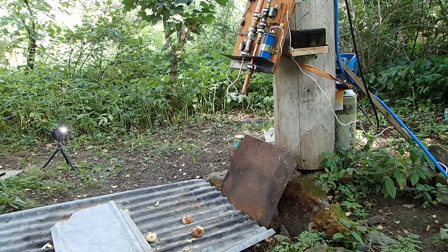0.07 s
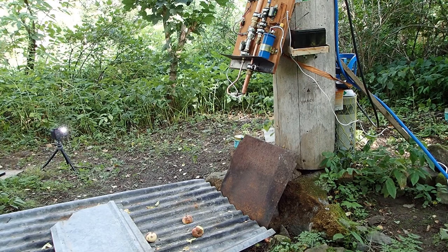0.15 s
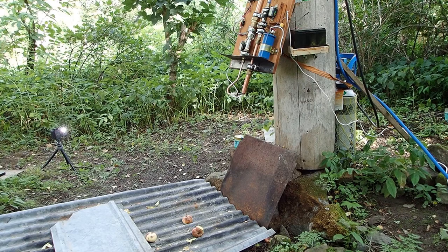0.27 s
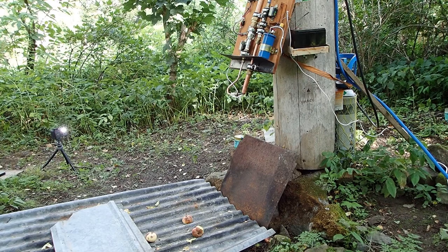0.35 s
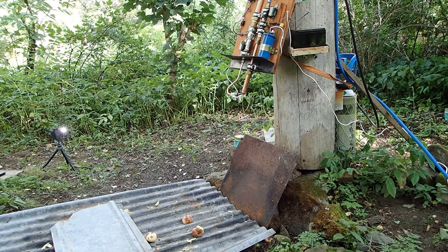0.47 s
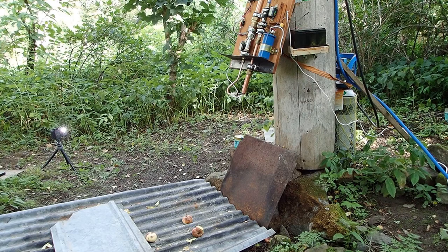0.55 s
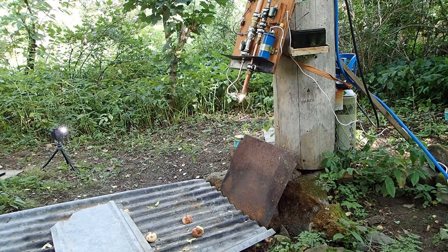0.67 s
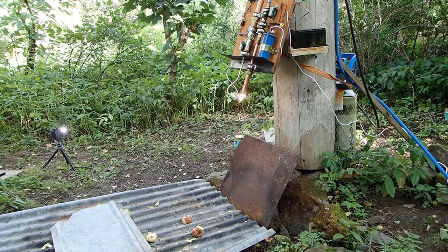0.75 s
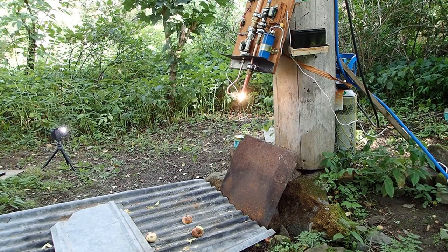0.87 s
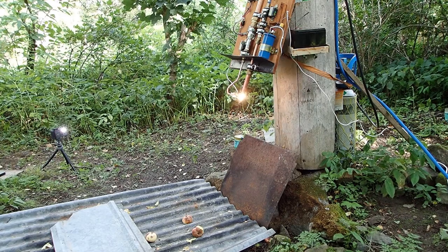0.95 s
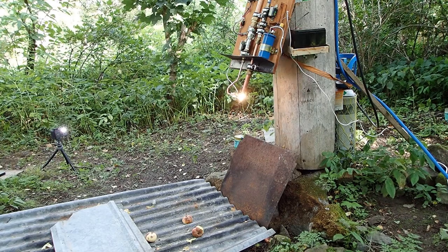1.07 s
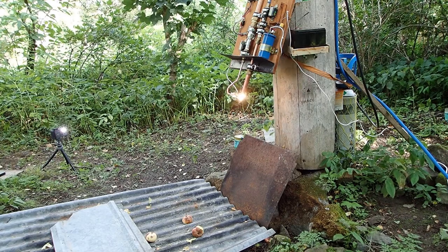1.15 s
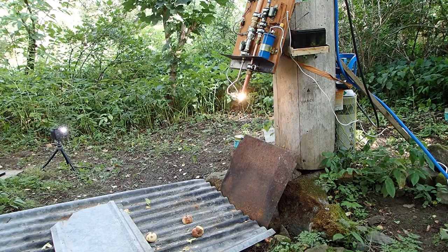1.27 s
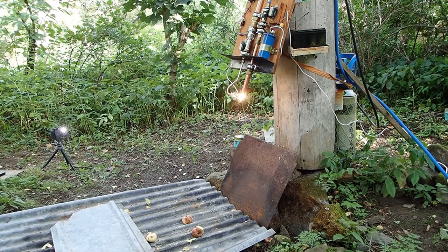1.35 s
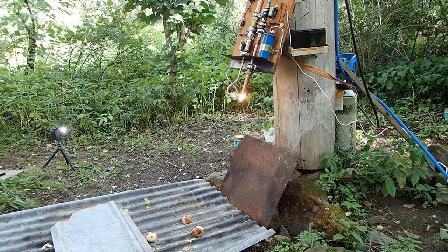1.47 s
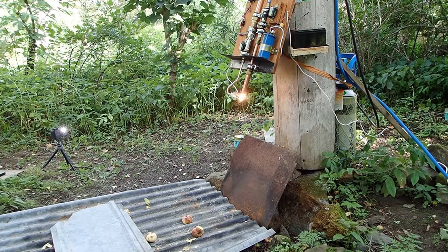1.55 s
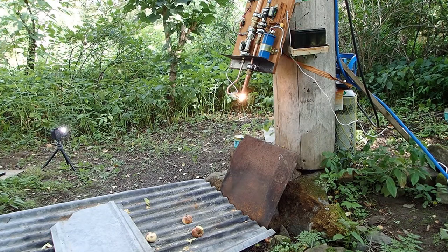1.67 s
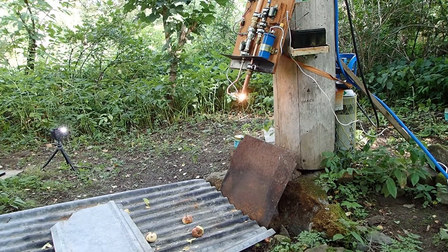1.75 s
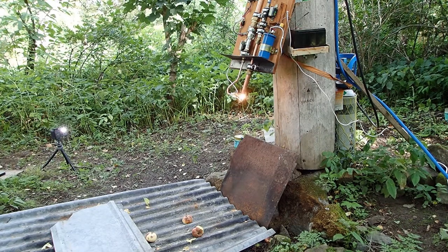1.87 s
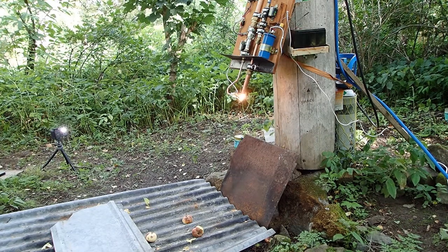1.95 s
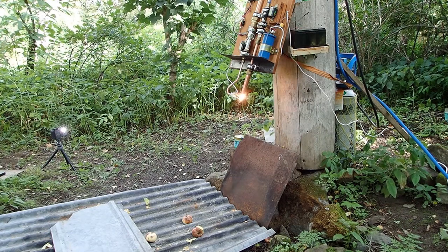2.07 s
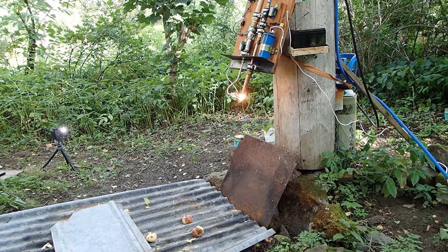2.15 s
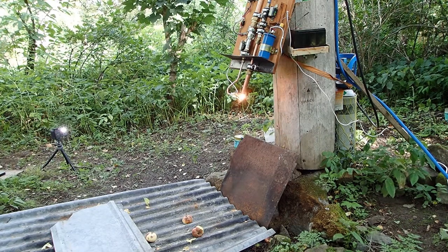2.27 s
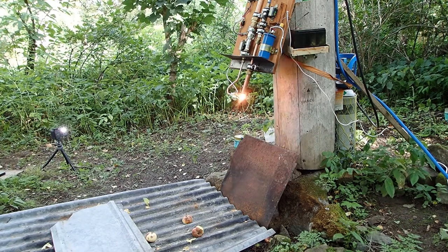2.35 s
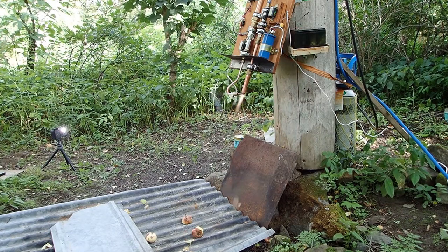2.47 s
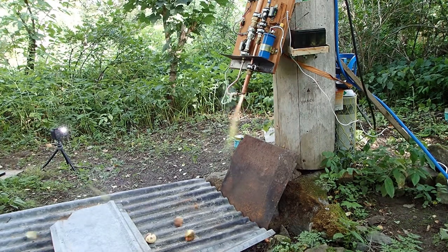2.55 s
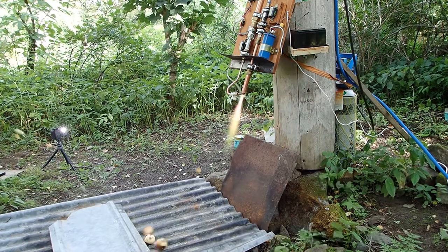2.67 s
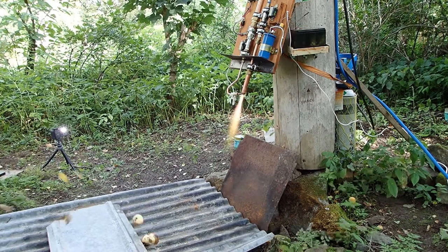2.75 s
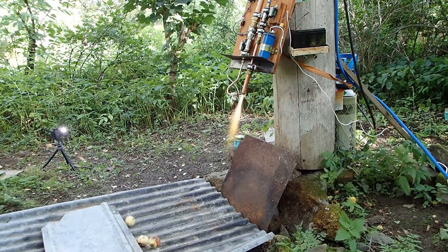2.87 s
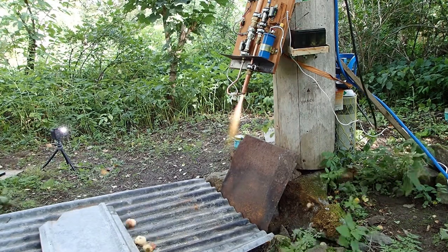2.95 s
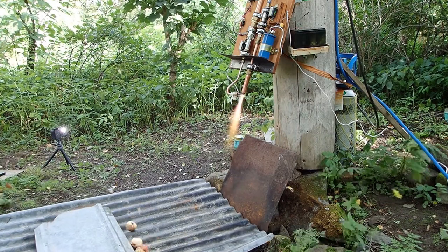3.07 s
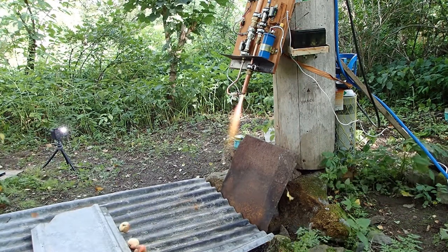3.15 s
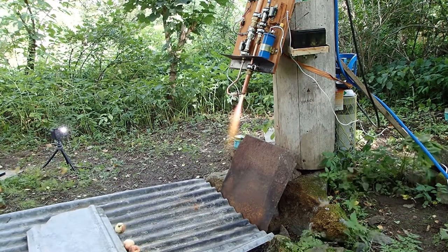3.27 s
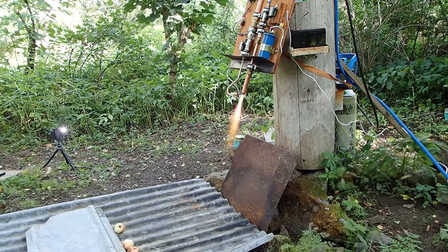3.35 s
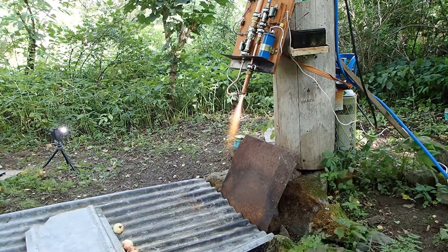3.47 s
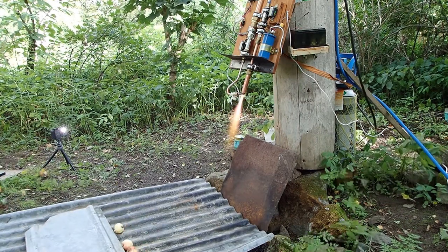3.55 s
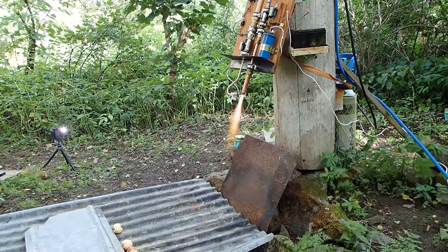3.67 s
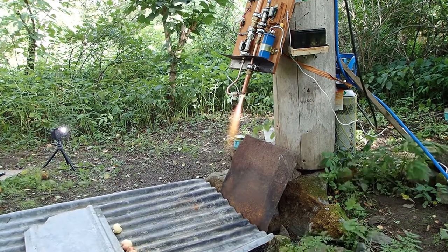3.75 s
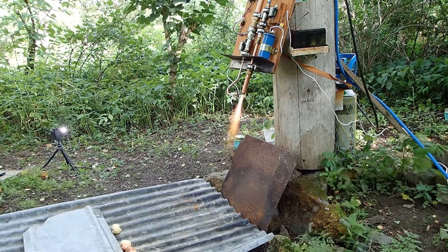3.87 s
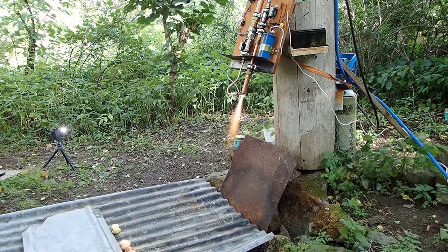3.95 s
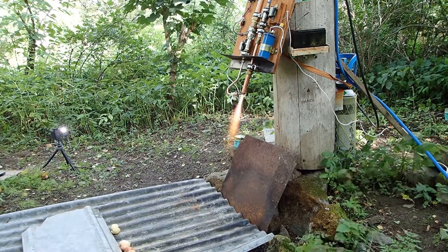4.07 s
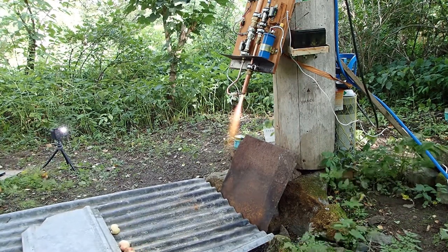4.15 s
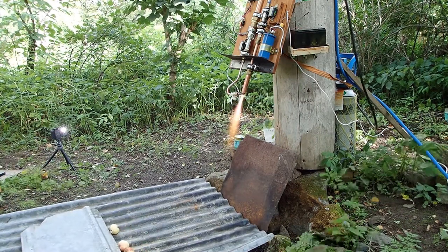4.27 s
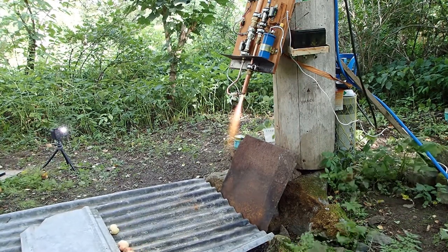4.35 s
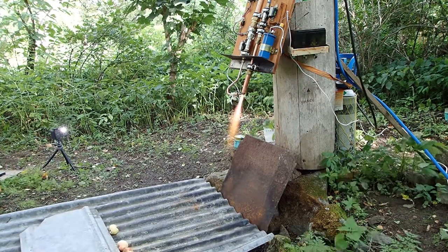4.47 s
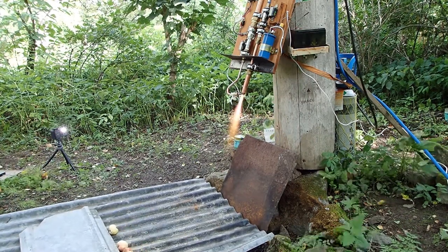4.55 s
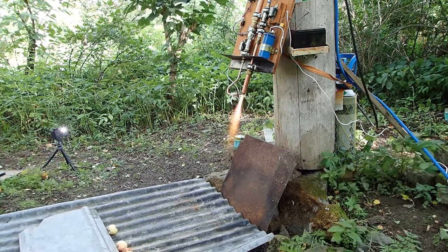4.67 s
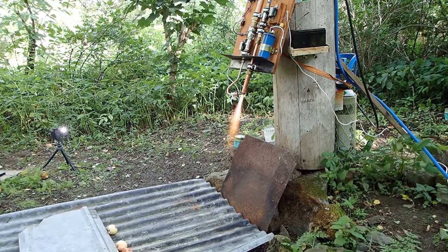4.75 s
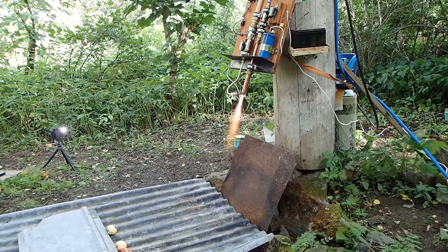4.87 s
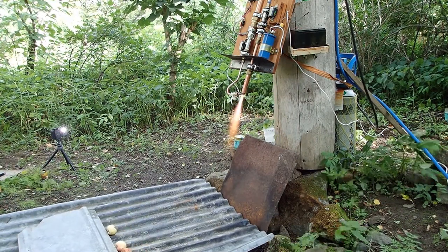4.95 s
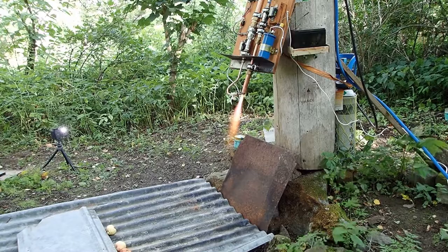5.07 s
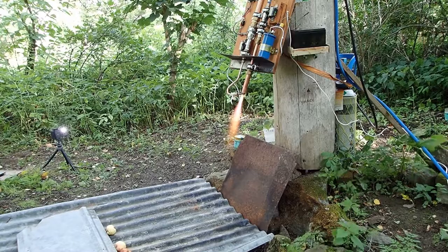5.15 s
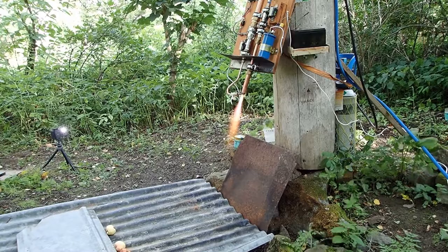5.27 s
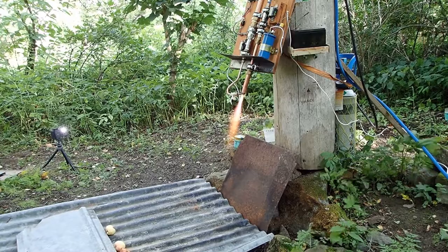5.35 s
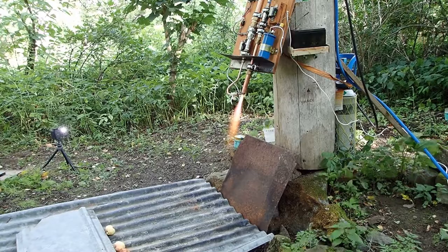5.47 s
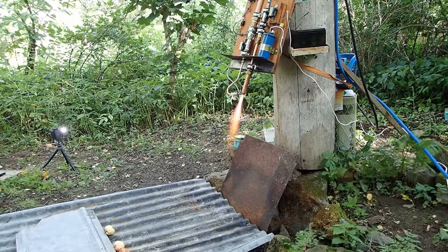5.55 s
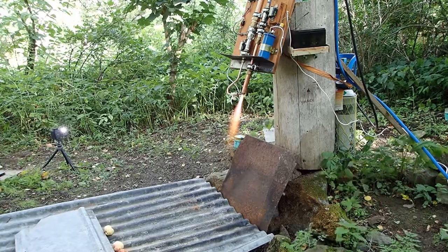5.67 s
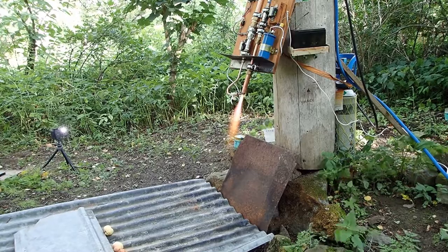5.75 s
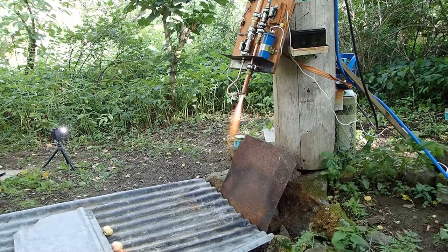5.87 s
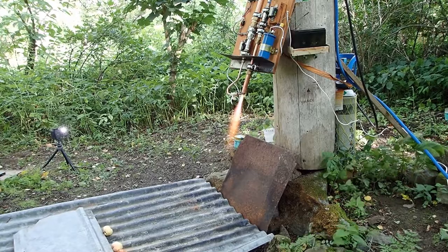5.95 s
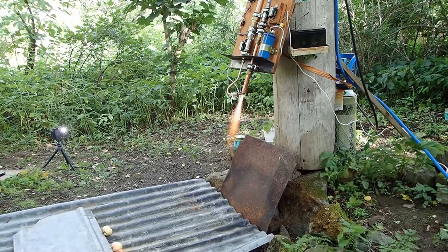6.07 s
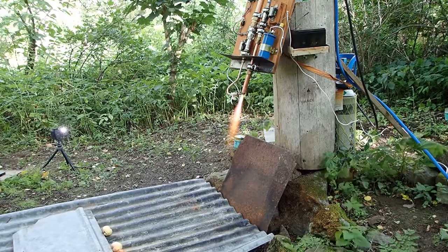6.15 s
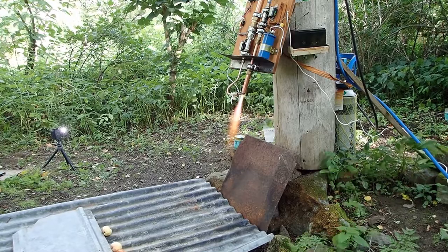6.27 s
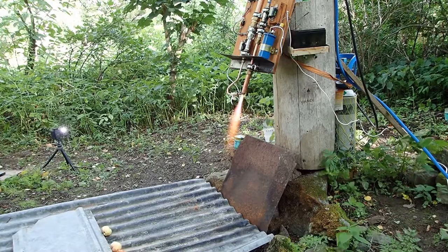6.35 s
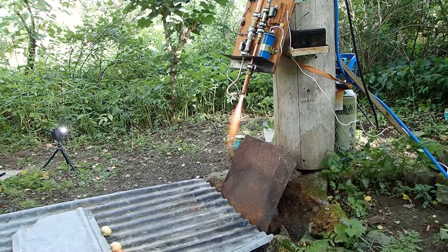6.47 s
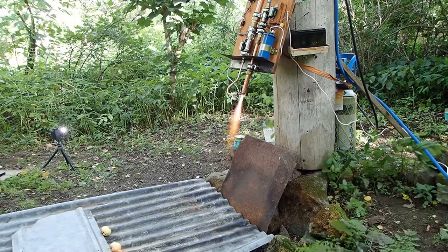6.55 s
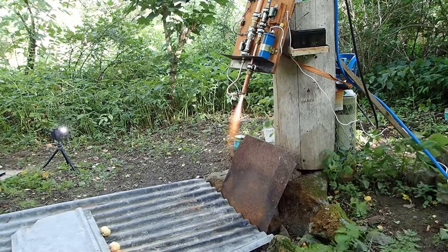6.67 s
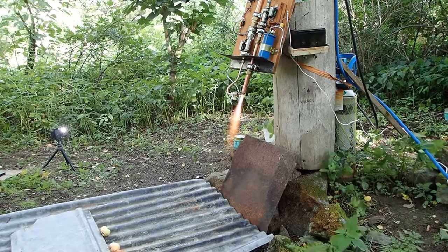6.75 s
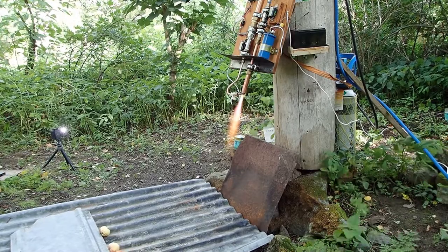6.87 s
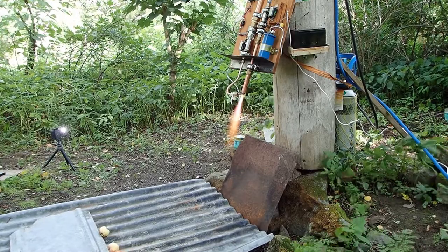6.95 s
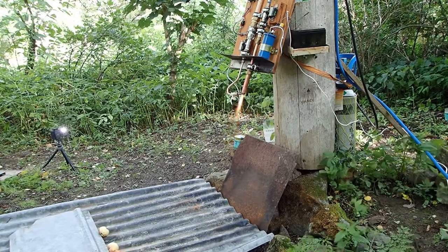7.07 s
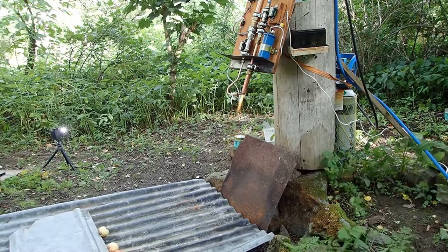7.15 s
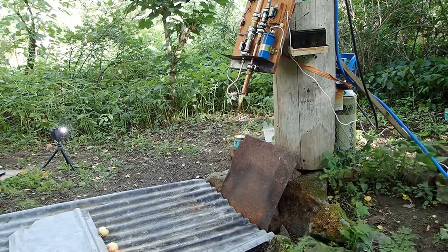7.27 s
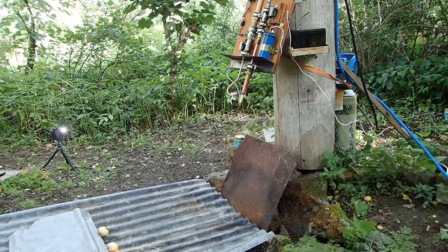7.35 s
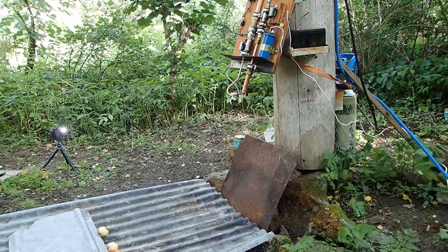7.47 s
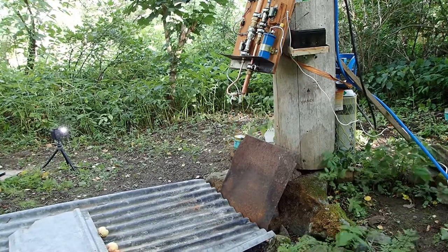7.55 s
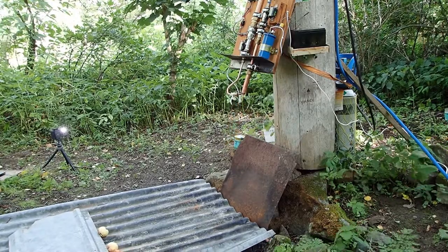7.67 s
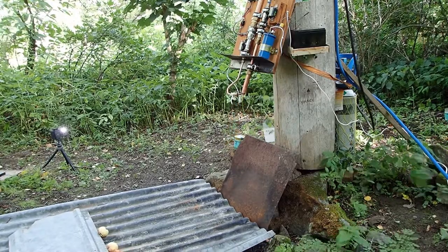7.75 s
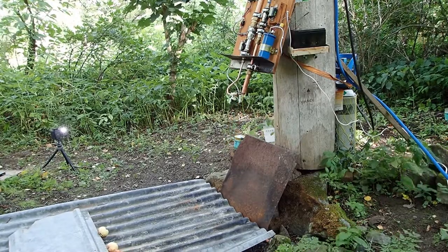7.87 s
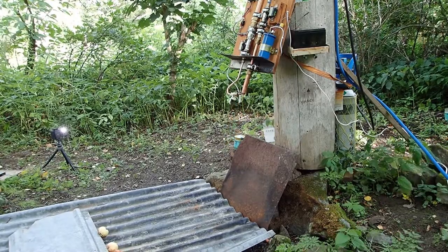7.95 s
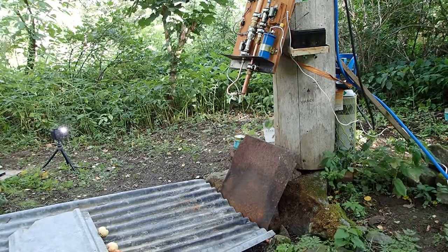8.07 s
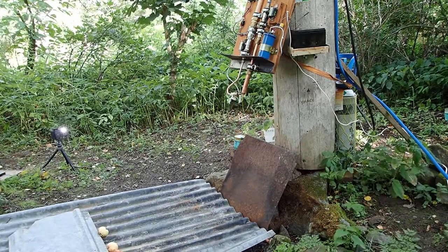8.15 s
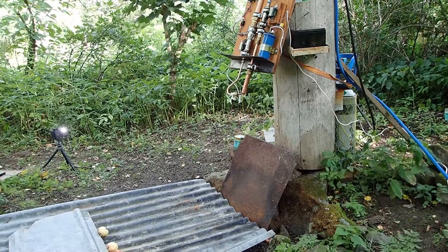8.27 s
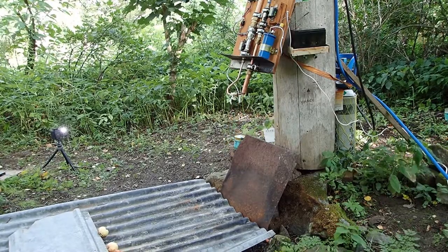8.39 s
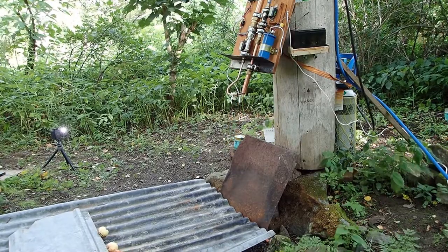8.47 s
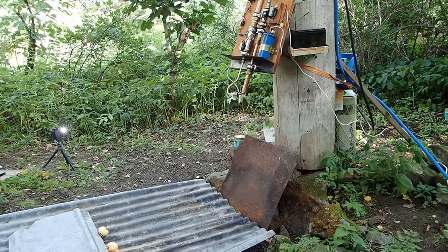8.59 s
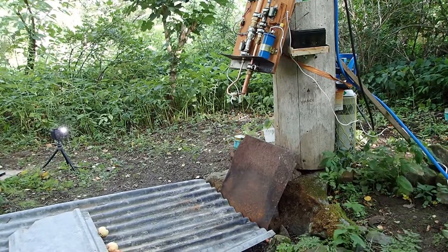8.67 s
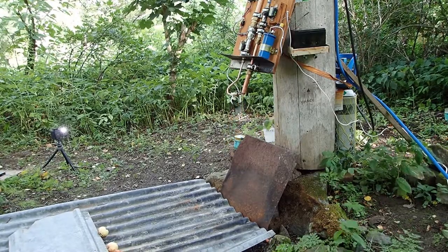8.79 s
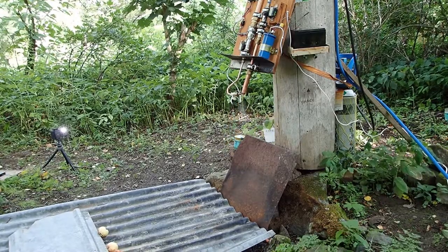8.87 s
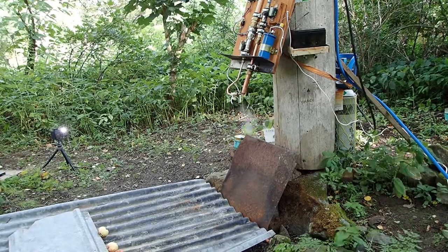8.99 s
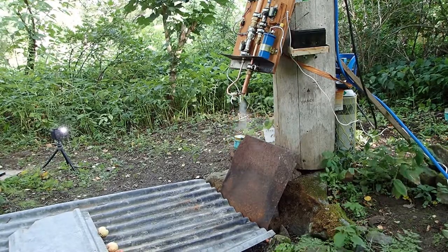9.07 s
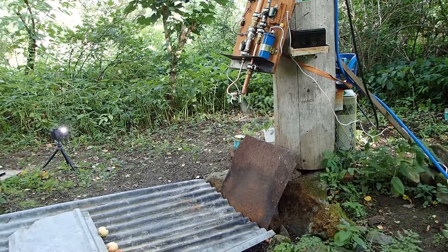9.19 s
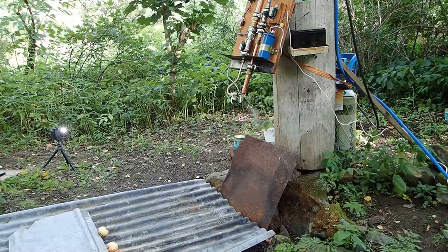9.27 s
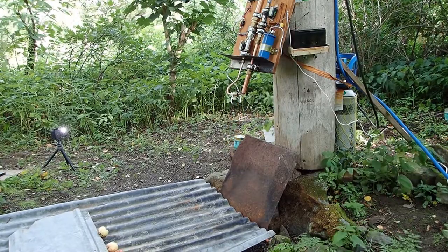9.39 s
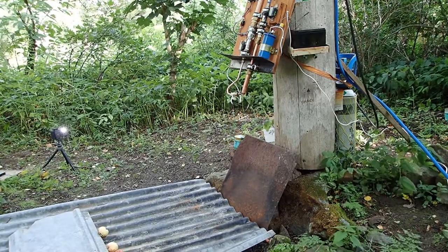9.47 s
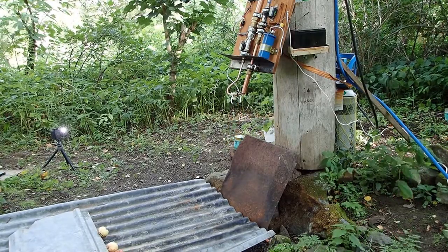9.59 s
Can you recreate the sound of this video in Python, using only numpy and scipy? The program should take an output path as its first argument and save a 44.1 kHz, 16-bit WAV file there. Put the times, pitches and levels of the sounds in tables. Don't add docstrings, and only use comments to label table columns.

```python
import sys
import numpy as np
from scipy import signal
from scipy.fft import rfft, irfft, next_fast_len
from scipy.io import wavfile
from scipy.ndimage import uniform_filter1d, map_coordinates

SR = 44100
rng = np.random.default_rng(int(sys.argv[2]) if len(sys.argv) > 2 else 0)


def volts_from_decibels(level):
    exponent = np.asarray(level, float) / 20
    return 10 ** exponent


def store_pcm(level_fs):
    pcm = np.round(np.clip(level_fs, -1, 1) * 32767).astype(np.int16)
    wavfile.write(sys.argv[1], SR, np.atleast_2d(pcm).T)


N = 424241

VALVES = [
    .0735,
    .781,
    2.5872,
    7.22,
    7.7,
    8.85,
    9.63,
]
LIT, CUT_OFF = VALVES[2], VALVES[3]
# [t/s, hiss level/dB]
DRAIN_FLOW = [
    (8.85, -31),
    (8.9, -29),
    (9.1, -32),
    (9.51, -49),
    (9.6, -56),
]
WARM_S = 0.091


def along(points, hz):
    f, v = np.transpose(points)
    return np.interp(np.log(hz + 1), np.log(f + 1), v)


def unit(x):
    return x / np.sqrt(np.mean(x ** 2) + 1e-20)


def span(rows, on, off, rise, fall):
    s, *cols = np.transpose(rows)
    start = round((on - rise / 2) * SR)
    end = min(N, round((off + fall / 2) * SR))
    t = np.arange(start, end) / SR
    opening = np.clip((t - t[0]) / rise, 0, 1)
    closing = np.clip((off + fall / 2 - t) / fall, 0, 1)
    return start, t, np.sqrt(opening * closing), [np.interp(t, s, c) for c in cols]


def wobble(n, rate):
    knots = rng.standard_normal(int(n * rate / SR) + 4)
    return map_coordinates(knots, [np.arange(n) * rate / SR])


def filtered(x, response):
    m = next_fast_len(x.shape[-1] + 8192)
    return irfft(rfft(x, m) * response(np.fft.rfftfreq(m, 1 / SR)), m)[..., :x.shape[-1]]


def ports(direct, scattered, spread):
    # [f/Hz, likeness of the two ports]
    likeness = [(60, .8), (150, .97), (1000, .975), (2500, .975), (3800, .87), (6500, .92), (8500, .83),
                (11000, .84), (14000, .75)]
    # [f/Hz, left over right level/dB]
    lean = [(60, -2), (110, -8.5), (200, -7.5), (380, -2.5), (700, 0.5), (1290, 0.5), (2380, -2.5),
            (4400, -3), (8120, 2.5), (15000, 3)]
    # [f/Hz, phase by which left leads/rad]
    lead = [(60, .63), (150, .83), (300, .83), (720, .48), (1300, .12), (2500, 0), (3800, .2), (5000, .7),
            (6000, .31), (7000, .62), (8000, .28), (11000, .06), (13500, .27)]

    def turn(hz):
        return np.arccos(np.clip(along(likeness, hz), 0, 1) ** spread) / 2

    def half(hz):
        return along(lean, hz) * np.log(10) / 40 + .5j * along(lead, hz)

    mid = filtered(direct, lambda hz: np.cos(turn(hz)))
    side = filtered(scattered, lambda hz: np.sin(turn(hz)))
    return filtered(np.array([mid + side, mid - side]), lambda hz: np.exp(half(hz) * [[1], [-1]]))


def add(out, start, x):
    out[:, start:start + x.shape[1]] += x


def swells(t, events, length):
    return sum(volts_from_decibels(db) * np.exp(-((t - s - length) / length) ** 2) for s, db, *_ in events)


def surge(t):
    return np.exp(-((t - 2.78) / .075) ** 2)


def jet(out, rows, air, tube, order, rise, fall, flutter_db, eddy_db, puff_db,
        roar_db=-0.87, tube_db=-6.0, flow_db=1.17, count=1):
    # [roar level/dB, its dB per dB of flow, its drift/(dB/s), fizz level/dB, its dB per dB of flow]
    blend = [
        (-3, 0.4, 0.4, -5, -0.3),
        (-11, -0.35, -4, -15, -0.3),
        (-8, -1.05, -0.22, -12.5, -0.1),
        (-18, 0.3, -8, -11.5, 0),
        (-23, 0.05, 1.3, -11.5, 0),
        (-14.5, -0.18, 5, -4.5, 0.1),
    ]
    # [t/s, depth/dB, half length/s]
    gaps = [
        (4.827, 2, 0.027),
        (7.105, 2, 0.024),
        (7.315, 2, 0.013),
        (7.462, 4.5, 0.0076),
        (7.59, 8, 0.007),
    ]
    # [t/s, extra fizz/dB, extra roar/dB, half length/s]
    spits = [
        (2.568, 1, 4, 0.028),
        (8.15, 4.5, 0.5, .09),
        (8.61, 3, -2, 0.13),
        (8.845, -2, -1, 0.048),
        (8.915, 0, 6, .015),
        (8.95, 0, 4.5, 0.036),
    ]
    scatter = [1.5, 1, 2.4, 2.3, 1.6, 1]
    flame_out_db, flame_out_s = 4.5, 0.06
    cold_roar_db, surge_roar_db = 5, 5
    roar_hz, fizz_hz = 3000, 10000

    start, t, ramp, (hiss_db,) = span(rows, VALVES[order], VALVES[order + count], rise, fall)
    n = len(t)
    low_db, low_follows, low_drift, fizz_db, fizz_follows = blend[order]
    for s, db, half in gaps:
        hiss_db = hiss_db - db * np.exp(-((t - s) / half) ** 2)
    swing_db = hiss_db - hiss_db.mean()
    low_db = low_db + low_follows * swing_db + low_drift * (t - t.mean())
    low_db = low_db + surge_roar_db * surge(t)
    low_db = low_db - flame_out_db * np.exp(-((t - CUT_OFF) / flame_out_s) ** 2)
    low_db = low_db - cold_roar_db * np.exp(-np.abs(t - LIT) / WARM_S) * (t > LIT)
    fizz_db = fizz_db + fizz_follows * swing_db
    for s, more_fizz_db, more_roar_db, half in spits:
        bump = np.exp(-((t - s) / half) ** 2)
        fizz_db = fizz_db + more_fizz_db * bump
        low_db = low_db + more_roar_db * bump

    def colour(hz):
        power = volts_from_decibels(2 * along(air, hz))
        for c, w, db in tube:
            power = power + volts_from_decibels(2 * (db + tube_db)) / (1 + (2 * (hz - c) / w) ** 2) ** 1.22
        return np.sqrt(power)

    eddies = volts_from_decibels(eddy_db * wobble(n, 300)) * rng.standard_normal((2, n))
    pair = ports(*filtered(eddies, colour), scatter[order])
    roar = filtered(pair, lambda hz: 1 / (1 + (hz / roar_hz) ** 10))
    fizz = filtered(pair, lambda hz: 1 - 1 / (1 + (hz / fizz_hz) ** 40))
    puffs = volts_from_decibels(puff_db * wobble(n, 70))
    lumps = filtered(puffs * roar, lambda hz: 1 - 1 / (1 + (hz / 60) ** 4))
    mix = unit(pair - roar - fizz)
    mix = mix + volts_from_decibels(low_db + roar_db) * unit(lumps) + volts_from_decibels(fizz_db) * unit(fizz)
    flutter = flutter_db * wobble(n, 18)
    add(out, start, ramp * volts_from_decibels(hiss_db + flow_db + flutter) * mix)


UNDER = np.array([0, 3])


def leak(out):
    # [t/s, hiss level/dB]
    flow = [
        (.1, -50),
        (9.6, -54.5),
    ]
    # [f/Hz, spectral level/dB]
    air = [(24, -45), (40, -6), (91, -4), (108, -7), (235, -4), (1600, -3.5), (1770, -1), (2450, -23),
           (3470, -22), (4500, -16), (5860, -6.5), (7340, -5.5), (9190, -13), (10900, -24), (13400, -11),
           (15500, -23)]
    # [f/Hz, width/Hz, level/dB]
    tube = [(6060, 75, -3), (6540, 170, -3), (7470, 110, -6), (9020, 140, 3.5), (11700, 120, -6),
            (12400, 150, -16), (13200, 140, -6), (13600, 57, -9), (14300, 130, -12)]
    jet(out, flow, air - UNDER, tube, order=0, count=6, rise=0.00204, fall=.004,
        flutter_db=1.0, eddy_db=0.5, puff_db=0.7)


def buffet(out):
    # [t/s, peak level/dB, f/Hz]
    gusts = [(2.714, -29, 159.3), (2.975, -37, 218), (3.216, -29, 195.8), (3.372, -29, 220),
             (3.504, -26, 212), (3.75, -32, 180), (3.807, -25, 201.6), (4.171, -28, 204),
             (4.222, -35, 218.6), (4.385, -28, 208), (4.681, -35, 197.4), (4.858, -35, 153.9),
             (5.067, -34, 149.8), (5.258, -42, 181.6), (5.291, -31, 205), (5.427, -45, 209.5),
             (5.506, -38, 179), (5.59, -55, 137), (5.668, -51, 176), (5.846, -51, 70.6),
             (5.846, -26, 134.4), (6.173, -29, 134.8), (6.379, -35, 216.8), (6.928, -25, 199),
             (6.977, -32, 120), (7.099, -41, 193.3)]
    # [t/s, peak level/dB, f/Hz]
    knocks = [(7.5, -38, 209), (7.54, -39, 170), (7.59, -32, 190), (7.785, -43, 110), (7.93, -46, 130),
              (8.03, -53, 110), (8.9, -34, 380), (2.71, -28, 200), (2.737, -24, 220), (2.765, -25, 200),
              (2.786, -33, 237), (2.808, -28, 170), (2.829, -30, 300)]
    # [f/Hz, spectral level/dB]
    rumble = [(20, -20), (40, -15), (70, -4.5), (150, -3.5), (400, -3.5), (900, -6), (2000, -60)]
    calm_db = [-66, -73, -50.5, -63, -67, -63]
    wake_db, wake_s = -20.5, 0.22
    surge_stir_db = 13
    shared = .45

    start = round(VALVES[0] * SR)
    t = np.arange(start, N) / SR
    stage = np.searchsorted(VALVES[1:], t)
    stage_db = uniform_filter1d(np.take(calm_db, stage) * 1., size=SR // 20)
    wake = np.interp(t, t[::200], swells(t[::200] + wake_s, gusts, wake_s))
    stir = volts_from_decibels(stage_db) + volts_from_decibels(wake_db) * wake * (t > LIT)
    stir_db = 20 * np.log10(stir) + surge_stir_db * surge(t)
    lumps_db = 2.6 * np.array([wobble(len(t), 21), wobble(len(t), 16)])
    air = unit(filtered(rng.standard_normal((2, len(t))), lambda hz: volts_from_decibels(along(rumble, hz))))
    left, right = air * volts_from_decibels(stir_db - 0.5 + lumps_db)
    left = (1 - shared) * left + shared * np.roll(right, -30)
    add(out, start, np.array([left, right]) * volts_from_decibels([[-4], [3]]))

    t = np.arange(SR // 16) / SR
    for s, db, hz in gusts + knocks:
        turn = rng.uniform(0, 2 * np.pi) + np.array([[1], [0]]) * rng.normal(0.73, 0.8)
        push = np.exp(-((t - .013) * hz / 0.57) ** 2) * np.cos(2 * np.pi * hz * t + turn)
        add(out, round(s * SR), volts_from_decibels(db + 3.5) * push * volts_from_decibels([[-5], [4]]))


def torch(out):
    # [t/s, hiss level/dB]
    flow = [
        (.79, -14),
        (.844, -17.5),
        (1.066, -15.5),
        (1.186, -17.5),
        (2.064, -18),
        (2.336, -14.5),
        (2.52, -14),
        (2.57, -14.5),
    ]
    # [f/Hz, spectral level/dB]
    air = [(24, -75), (40, -35), (166, -9.5), (280, -12), (562, -4.5), (838, -10.5), (1080, 3.5),
           (1350, -11), (1730, -4), (3390, -31), (5650, -16), (6640, -9), (7300, -13), (8960, -11),
           (10400, -23.5), (13400, -18.5), (15500, -32)]
    # [f/Hz, width/Hz, level/dB]
    tube = [(1040, 110, -23), (1540, 180, -1.5), (4250, 170, -13), (4900, 87, -1), (5370, 270, -1.5),
            (5950, 220, 2), (6430, 160, 2.5), (6830, 170, 4), (7090, 150, 2), (7570, 130, -1),
            (8050, 170, -3), (8670, 250, -1.5), (9050, 150, -5), (9470, 220, -3.5), (11000, 220, -14),
            (11400, 160, -15), (12300, 220, -29), (13900, 120, -22)]
    jet(out, flow, air - UNDER, tube, order=1, rise=0.011, fall=0.0049,
        flutter_db=0.66, eddy_db=0.8, puff_db=0.5, tube_db=-8.0)


def burn(out):
    # [t/s, hiss level/dB]
    flow = [
        (2.595, -10),
        (2.66, -12),
        (2.783, -13.5),
        (2.95, -17),
        (3.2, -16),
        (4.25, -16),
        (5.4, -16),
        (7.22, -15.5),
    ]
    # [f/Hz, spectral level/dB]
    air = [(24, -68), (40, -45), (162, -24.5), (461, -20), (653, -12), (722, -4), (998, -13), (1490, -11.5),
           (3140, -34), (4030, -27), (5300, -15.5), (6500, -9.5), (7000, -9.5), (7650, -14.5), (8740, -10),
           (9500, -14.5), (10400, -20), (11400, -14.5), (14000, -16), (15500, -25.5)]
    jet(out, flow, air, [], order=2, rise=.002, fall=.05,
        flutter_db=0.65, eddy_db=0.59, puff_db=2.0, roar_db=-1.0)


def ignition(out):
    # [t/s, peak level/dB]
    light_up = [
        (2.588, 0),
    ]
    t = np.arange(SR // 20) / SR
    for s, db in light_up:
        push = (1 - t / .0006) * np.exp(-t / .0006) * (1 - np.exp(-t / .0001))
        burst = 0.14 * volts_from_decibels(-60 * t / 0.02) * np.diff(rng.standard_normal((2, len(t) + 1)))
        add(out, round(s * SR), volts_from_decibels(db + 6.0) * ports(burst[0] - push, burst[1], spread=1.1))


def singing(out, rows, pitch, modes, on, off, edge, gain_db, lift_db, jitter, burst_db, pops=[(0, -140)]):
    # [f/Hz, width/Hz, level/dB]
    kick_ring = [
        (780, 160, -3),
        (1520, 250, 2),
        (2065, 290, -10),
    ]
    kick_db, kick_late_s = 31, .001
    low_kick = 0.32
    cold_db, surge_lift_db = 3, 5
    wander = 0.00393

    start, t, ramp, (level_db,) = span(rows, on, off, edge, edge)
    n = len(t)
    lift_db = lift_db + surge_lift_db * surge(t) - cold_db * np.exp((LIT - t) / WARM_S)
    drift = jitter * (wobble(n, 40) ** 2 - 1) + wander * wobble(n, 6)
    pitch_hz = np.interp(t, *np.transpose(pitch)) * (1 + drift)
    turns = 2 * np.pi * np.cumsum(pitch_hz) / SR
    kicked = np.interp(t, t[::20], swells(t[::20], pops, 0.0028))
    bursts = volts_from_decibels(burst_db * wobble(n, 95)) + kicked / volts_from_decibels(level_db + 4.0)

    pair = np.zeros((2, n))
    for multiple, width_hz, db, steady in modes:
        upper = multiple > 1.5
        noise = bursts ** (1 if upper else low_kick) * rng.standard_normal((2, 2, n))
        kicks = unit(filtered(noise, lambda hz: 1 / (1 + 2j * hz / width_hz) ** 2))
        share = np.clip(steady, 0, 1)
        swing = np.sqrt(1 - share) * (kicks[0] + 1j * kicks[1])
        swing = swing + np.sqrt(2 * share) * np.array([[1], [0]])
        pair += volts_from_decibels(db + lift_db * upper) * (swing * np.exp(1j * multiple * turns)).real

    blows = np.zeros(n)
    for (s, db), sign in zip(pops, rng.choice([-1, 1], len(pops))):
        place = round((s + kick_late_s) * SR) - start
        blows[min(n - 1, max(0, place))] = sign * volts_from_decibels(db + kick_db - 4.5 * surge(s))

    def ring(f):
        return sum(volts_from_decibels(db) * (1j * f * w / (c * c - f * f + 1j * f * w)) ** 2 for c, w, db in kick_ring)

    pair[0] += filtered(blows, ring) / volts_from_decibels(level_db)
    add(out, start, ramp * volts_from_decibels(level_db + gain_db) * ports(*pair, spread=2.1))


def small_pops(count):
    slip, size = rng.uniform(size=count), rng.standard_normal(count)
    s = LIT + (np.arange(count) + slip) * (CUT_OFF - LIT) / count
    return list(zip(s, -19.5 + 2 * size))


def chamber_song(out):
    # [t/s, level/dB]
    song = [
        (2.6, -14.5),
        (2.68, -22),
        (2.8, -16.5),
        (3.0, -21.5),
        (4.1, -23),
        (5.3, -22),
        (6, -26.5),
        (6.7, -25),
        (7.2, -27),
    ]
    # [t/s, f/Hz]
    pitch = [
        (2.6, 645),
        (2.63, 635),
        (2.66, 655),
        (2.71, 668),
        (2.735, 705),
        (2.79, 735),
        (2.9, 730),
        (3.2, 726),
        (7, 727),
        (7.2, 720),
    ]
    # [multiple of the fundamental, width/Hz, level/dB, steady share]
    chamber = [
        (1, 30, 0, 0.92),
        (1.07, 154, -10, 0),
        (2.005, 110, -7.5, 0.16),
        (2.05, 590, -8.5, 0),
        (2.78, 150, -15, 0.1),
    ]
    # [t/s, peak level/dB]
    pops = [(2.6868, -11), (2.713, -13), (2.746, -14), (2.793, -11), (2.8389, -17), (2.8569, -10),
            (2.9592, -20), (3.037, -10), (3.0795, -14), (3.1298, -18), (3.1483, -12), (3.3488, -14),
            (3.5034, -11), (3.6162, -14), (3.6596, -13), (3.7573, -10), (3.7923, -17), (3.8127, -18),
            (3.9896, -10), (4.0686, -14), (4.4257, -10), (4.4518, -14), (4.5055, -12), (4.5625, -10),
            (4.6106, -10), (4.711, -16), (4.7506, -16), (4.7697, -14), (4.79, -13), (4.8962, -19),
            (5.013, -8), (5.0359, -14), (5.0783, -15), (5.1372, -15), (5.1911, -11), (5.252, -9),
            (5.2998, -9), (5.3357, -9), (5.3732, -10), (5.4435, -21), (5.4769, -21), (5.7199, -10),
            (5.7673, -9), (5.8491, -9), (5.875, -13), (5.9304, -15), (5.949, -12), (5.9888, -9),
            (6.0257, -14), (6.0456, -7), (6.1173, -8), (6.182, -14), (6.2357, -10), (6.2981, -10),
            (6.381, -11), (6.539, -11), (6.5597, -10), (6.7155, -14), (6.761, -15), (6.7874, -14)]
    singing(out, song, pitch, chamber, on=2.604, off=7.21, edge=.015, gain_db=-1.5, lift_db=.6,
            jitter=.008, burst_db=3, pops=pops + small_pops(count=190))


def sputter(out):
    # [t/s, hiss level/dB]
    flow = [
        (7.22, -16.5),
        (7.635, -17),
        (7.67, -31),
        (7.7, -32),
    ]
    # [f/Hz, spectral level/dB]
    air = [(24, -77), (40, -50), (154, -22.5), (350, -23), (522, -17), (998, -21.5), (1160, -13),
           (1910, -17), (2580, -27.5), (3220, -28.5), (6640, -1.5), (7650, -6.5), (8740, -4.5),
           (10400, -11), (13000, -4), (15500, -15)]
    jet(out, flow, air, [], order=3, rise=.05, fall=.04,
        flutter_db=.4, eddy_db=1.2, puff_db=1.8, roar_db=1.5, flow_db=1.3)


def purge(out):
    # [t/s, hiss level/dB]
    flow = [
        (7.7, -29),
        (7.79, -22.5),
        (7.9, -16.5),
        (8.65, -14.5),
        (8.776, -19.5),
        (8.85, -32),
    ]
    # [f/Hz, spectral level/dB]
    air = [(24, -61), (40, -22), (120, -35), (273, -36.5), (472, -25), (653, -27.5), (1560, -16),
           (2450, -30), (3390, -27.5), (6480, -1.5), (8310, -2), (9190, 0.5), (10400, -6), (14400, -11),
           (15500, -20)]
    # [f/Hz, width/Hz, level/dB]
    tube = [(1580, 140, -25), (6070, 110, -7), (6470, 100, -8), (7000, 65, 4.5), (7800, 120, 3),
            (8200, 130, -9), (8810, 91, 7.5), (9460, 53, 9.5), (10550, 83, 1.5), (11200, 170, -11),
            (12500, 60, -15), (14200, 92, -13)]
    jet(out, flow, air - UNDER, tube, order=4, rise=0.044, fall=.06,
        flutter_db=0.7, eddy_db=0.5, puff_db=0.5, tube_db=-4.5)


def drain(out):
    # [f/Hz, spectral level/dB]
    air = [(24, -61), (40, -34), (622, -8.5), (1560, -14), (1820, -15), (2110, -10.5), (2330, -50),
           (2620, -33), (3000, -46), (4500, -41), (4800, -26), (6320, -18), (9660, -16), (15500, -11)]
    jet(out, DRAIN_FLOW, air, [], order=5, rise=.06, fall=.004,
        flutter_db=1.3, eddy_db=2, puff_db=0.8, roar_db=4, flow_db=-1)


def pipe_whistle(out):
    # [t/s, f/Hz]
    sink = [
        (8.85, 6500),
        (9.05, 6470),
        (9.3, 6310),
        (9.62, 6290),
    ]
    # [multiple of the reference, width/Hz, level/dB, steady share]
    pipe = [(.289, 130, -15, 0), (.53, 120, -27, 0), (.655, 120, -27, 0), (.775, 130, -9, 0),
            (1, 130, 0, 0), (1.1, 100, -13, 0), (1.245, 150, -1, 0), (1.485, 190, -5, 0),
            (1.735, 300, -10, 0), (1.97, 200, -17, 0)]
    singing(out, DRAIN_FLOW, sink, pipe, on=8.86, off=9.8, edge=.14, gain_db=-1.0, lift_db=1.5,
            jitter=0.0017, burst_db=-2.0)


def scene():
    out = np.zeros((2, N))
    leak(out)
    buffet(out)
    torch(out)
    burn(out)
    ignition(out)
    chamber_song(out)
    sputter(out)
    purge(out)
    drain(out)
    pipe_whistle(out)
    return out


def band_limit(x):
    return signal.sosfilt(signal.butter(12, 15740, fs=SR, output="sos"), x)


def record(dry):
    rounded = dry / (1 + np.abs(dry / 1.08) ** 6) ** (1 / 6)
    return band_limit(rounded)


dry = scene()
out = record(dry)
store_pcm(out)
```